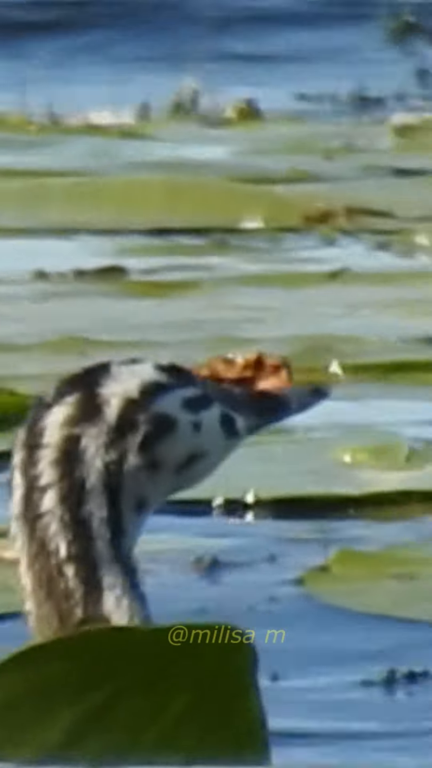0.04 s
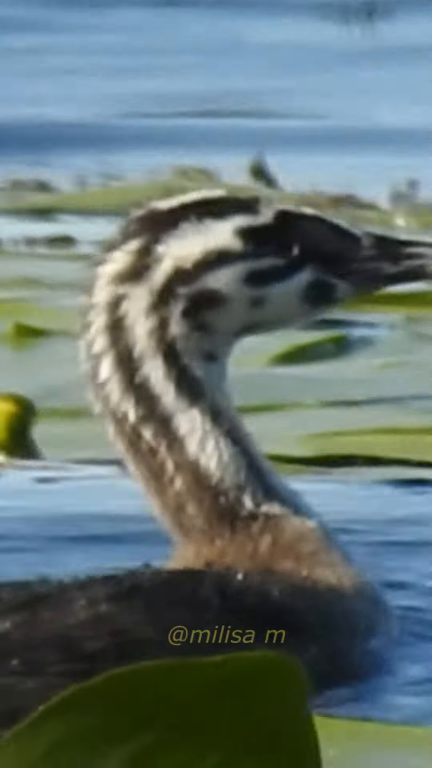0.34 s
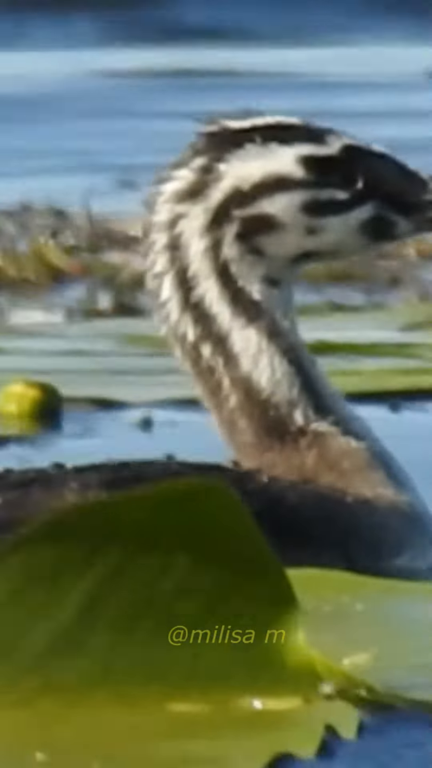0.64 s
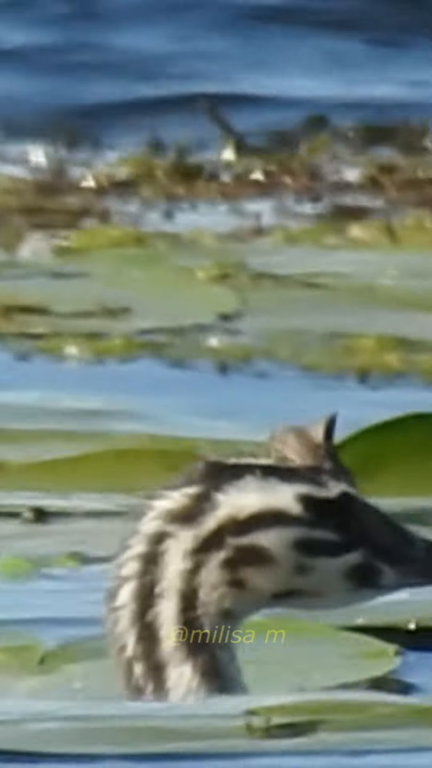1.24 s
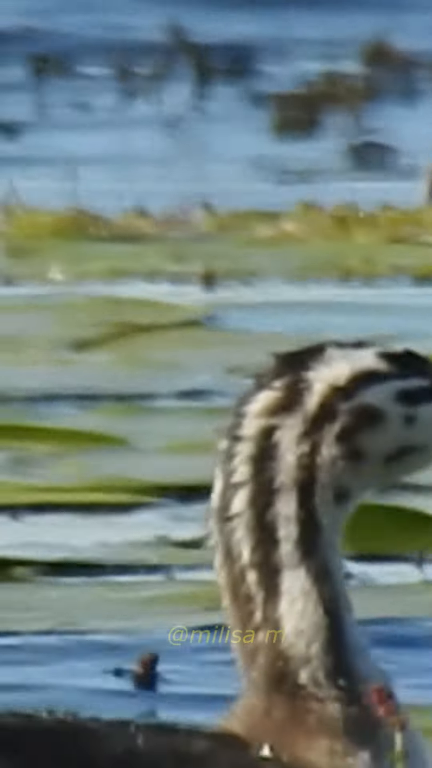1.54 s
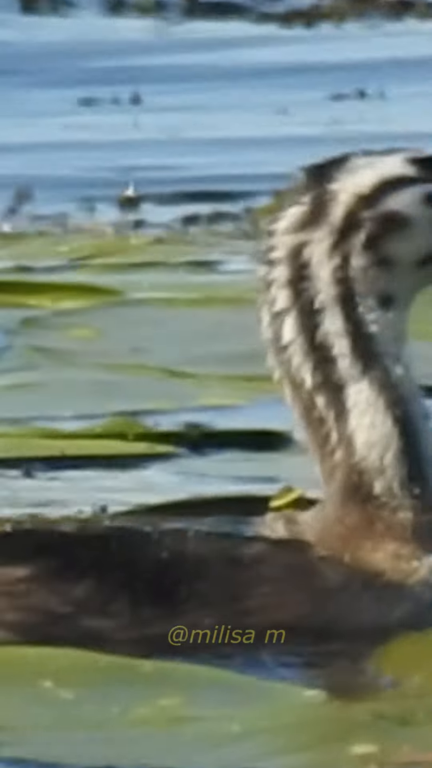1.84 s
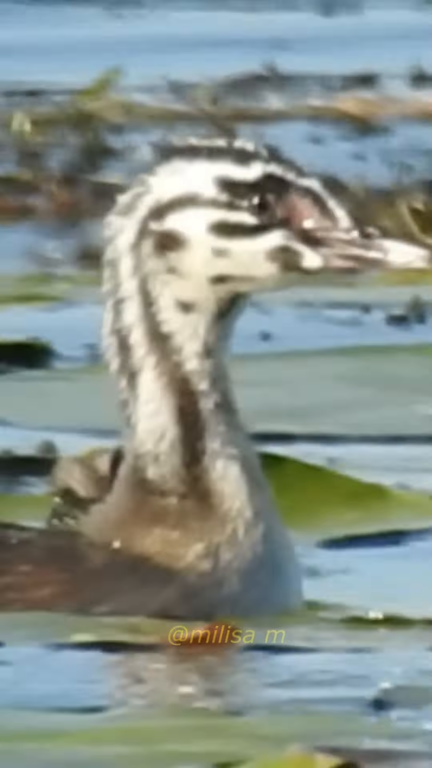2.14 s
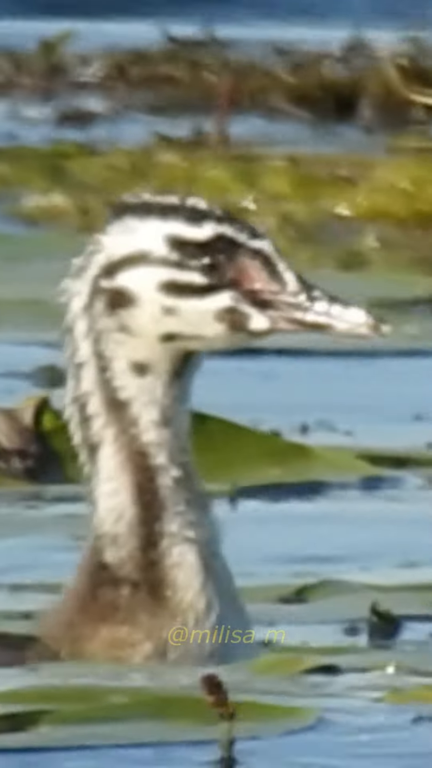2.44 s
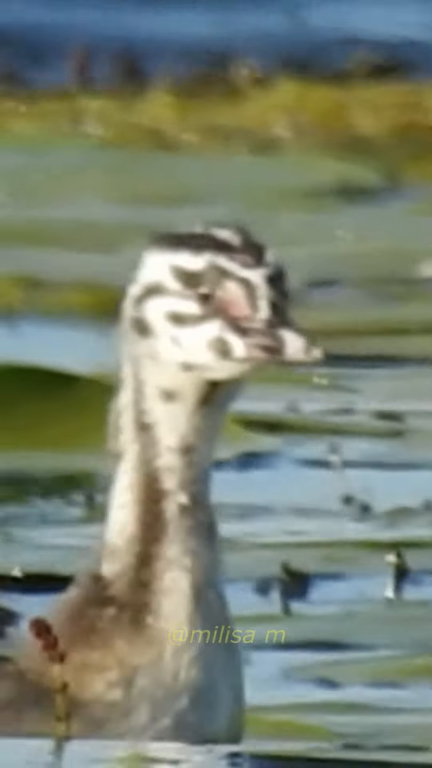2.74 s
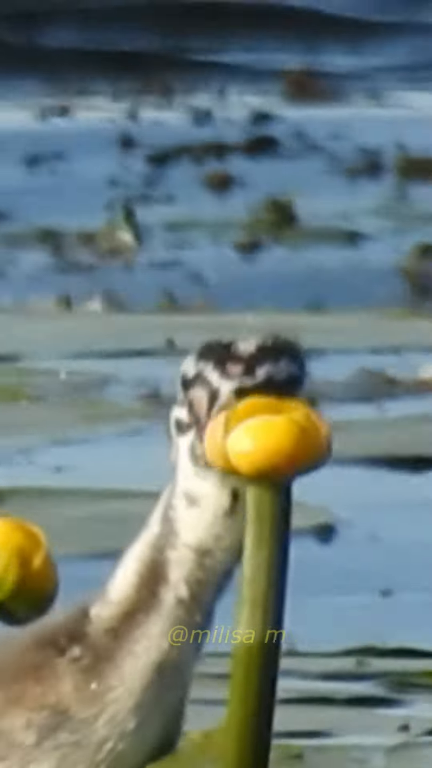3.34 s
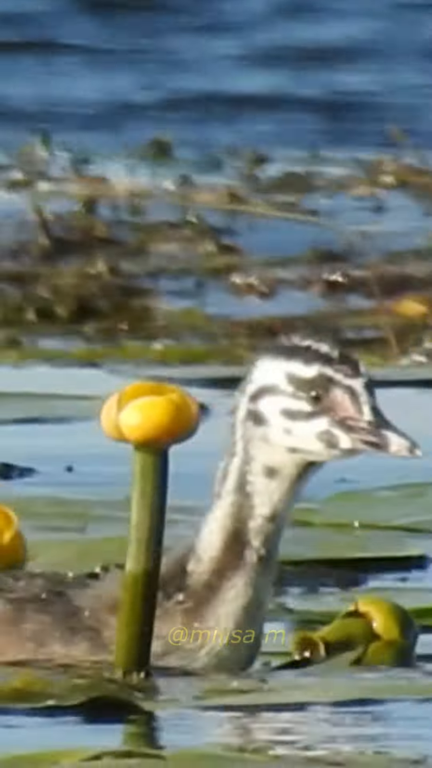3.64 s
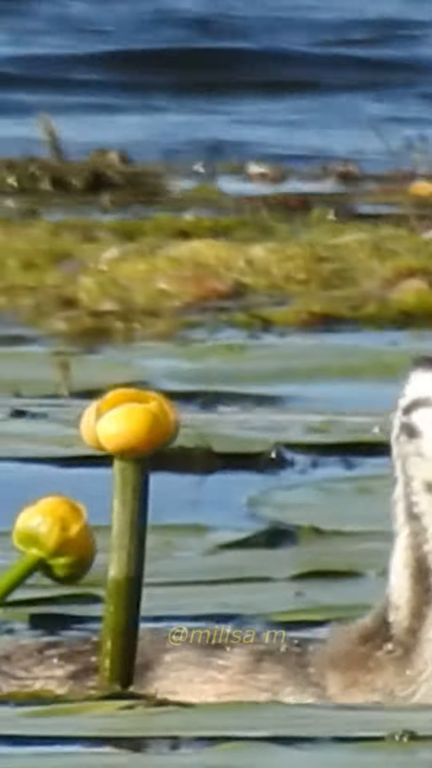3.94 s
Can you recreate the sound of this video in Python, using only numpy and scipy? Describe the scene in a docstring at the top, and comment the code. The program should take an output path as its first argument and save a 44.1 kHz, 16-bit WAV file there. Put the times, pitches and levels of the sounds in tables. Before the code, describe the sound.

Distant birdsong, with thin whistles, chips and piping notes, echoes lightly over a pond, right of the microphone. Soft wind and a low rumble lie beneath. The sound fades away, then cuts back in with more chirping.

```python
"""Small birds sing far off across a pond, mostly along the right bank. Each whistle, chip or hoot
is a pure tone that bends in pitch as it swells and dies, smeared by the echo of the trees.
Behind them a breeze makes a soft rush of air and reeds over a low rumble, both shaped from noise.
The sound fades to a moment of silence and comes back abruptly on a slightly louder stretch."""
import sys
import numpy as np
from scipy import signal
from scipy.fft import rfft, irfft, next_fast_len
from scipy.io import wavfile
from scipy.ndimage import uniform_filter1d, map_coordinates

SR = 44100
rng = np.random.default_rng(int(sys.argv[2]) if len(sys.argv) > 2 else 0)


def generate_wav(sig):
    """Save sig (samples, or channels by samples) to the path in sys.argv[1] as 16-bit PCM at SR."""
    pcm = np.round(np.clip(np.atleast_2d(sig).T, -1, 1) * 32767).astype(np.int16)
    wavfile.write(sys.argv[1], SR, pcm)


N = 176400  # 4 seconds
FADE_START_S, FADE_END_S, RESUME_S = 1.704, 2.515, 2.578

# Sliding notes. Pan is left minus right, so below zero is to the right; rasp is a share of the pitch.
# start_s, length_s, first_hz, middle_hz, last_hz, level_db, pan_db, echo_db, rasp
SLURRED_NOTES = [(-.04, .11, 5660, 5260, 4800, -38, -12, 3, .04),
                 (0.046, 0.11, 4985, 4600, 4605, -37, -9, 0.5, 0.0312),
                 (.0, .12, 2180, 2090, 2170, -45.5, -4, 8.5, 0.034),
                 (0.186, 0.046, 2684, 2751, 2680, -40, -5.5, 0, 0.043),
                 (0.344, 0.034, 1603, 1620, 1510, -44.5, -2, 2.5, 0.041),
                 (0.416, 0.051, 3060, 3206, 2950, -44.5, -8, 3, 0.038),
                 (.49, 0.062, 2467, 2667, 2710, -44, -18, 0.5, 0.019),
                 (.66, 0.019, 1595, 1710, 1590, -41.5, -5, 8, 0.12),
                 (.675, 0.053, 4080, 3870, 3760, -44, -8, 10, 0.018),
                 (0.717, 0.075, 3750, 3548, 3420, -36.5, -12.5, -2, 0.017),
                 (.935, 0.061, 1546, 1529, 1477, -46.5, -6, 3, 0.027),
                 (0.997, 0.056, 4400, 4550, 4850, -54, -2, 5, 0.015),
                 (1.129, 0.18, 1930, 1972, 2010, -55.5, -7, -21, 0.019),
                 (1.153, 0.022, 5370, 5100, 5070, -39, -16, 0, 0.049),
                 (1.175, 0.091, 4450, 4440, 4680, -49, -8, 0, 0.028),
                 (1.393, .11, 3400, 3584, 3540, -46.5, -7, 3, 0.044),
                 (1.45, 0.088, 4250, 4250, 4280, -48.5, -7, 0, 0.0045),
                 (1.485, .07, 3780, 3666, 3140, -43.5, -14, -1, 0.012),
                 (1.503, 0.045, 5600, 6080, 6150, -45.5, -20, 1, 0.01),
                 (1.667, 0.11, 6790, 6810, 6980, -41.5, -17, 6, 0.036),
                 (1.798, 0.22, 6860, 6710, 6510, -44.5, -15, 5, 0.033),
                 (1.824, .035, 2820, 2897, 2930, -46, -5, 0, 0.0076),
                 (1.984, 0.0355, 6250, 6080, 5960, -37.5, -20, 2, 0.012),
                 (2.446, .05, 4200, 3300, 2580, -40, -7.5, -12, 0.058),
                 (2.577, 0.066, 3340, 3450, 3440, -43.5, 0, 7, 0.037),
                 (2.61, .035, 3120, 1880, 1580, -38, -3.5, 4, 0.089),
                 (2.92, 0.055, 2410, 2620, 2480, -46, 0, 0, 0.032),
                 (2.993, 0.035, 2162, 2204, 2310, -41, -1, 4, 0.026),
                 (3.051, .27, 5950, 5870, 5900, -43, -25, 4, 0.034),
                 (3.3, 0.17, 4176, 4167, 4240, -40.5, -7.5, 5, 0.0268),
                 (3.428, 0.138, 4190, 4070, 4076, -42, -7, -1, 0.031),
                 (2.568, 0.15, 4300, 4310, 4260, -53.5, -3, 5, .012),
                 (3.219, .22, 2110, 2037, 2120, -54.5, -1, -5, 0.049),
                 (3.478, 0.33, 5390, 5260, 5360, -47.5, -14, 1, 0.017),
                 (3.68, 0.11, 2430, 2300, 2315, -44, -1.5, 4, 0.055),
                 (3.667, 0.059, 4800, 4450, 4360, -39, -14, 5, 0.042),
                 (3.744, 0.285, 3237, 3236, 3205, -40.5, -3, 8, 0.049),
                 (3.821, 0.022, 5380, 5040, 4730, -38, -13, 4, 0.038),
                 (3.842, 0.066, 4810, 4580, 4690, -38, -7, 3, 0.034),
                 (3.942, 0.038, 6050, 6110, 6050, -41.5, -21, 5.5, 0.013)]
# Piping notes: start_s, length_s, pitch_hz, level_db
PIPING_NOTES = [(1.804, 0.067, 2370, -40), (1.92, 0.053, 2371, -42), (2.013, 0.08, 2440, -38),
                (2.143, 0.052, 2416, -38.5), (2.231, 0.035, 2348, -35), (2.423, 0.065, 2367, -31.5),
                (2.756, 0.065, 2334, -40)]
# Low, far hoots: start_s, length_s, pitch_hz, level_db
FAR_HOOTS = [(-.03, 0.3, 621, -54), (0.199, 0.24, 590, -54.5), (0.417, 0.17, 566, -51.5),
             (1.246, 0.17, 589, -55), (1.648, 0.16, 559.7, -51.5)]

def bird_chorus():
    """Scattered birds slide between pitches, pipe on nearly one pitch, or hoot softly."""
    out = np.zeros((2, N))
    for start, length, first, middle, last, db, pan, echo, rasp in SLURRED_NOTES:
        add_with_echo(out, start, note(length, (first, middle, last), waver=rasp), db, pan, echo)
    for start, length, hz, db in PIPING_NOTES:
        pipe = note(length, hz * np.array([0.98, 1.005, 0.99]), waver=0.014)
        add_with_echo(out, start, pipe, db, pan_db=-4.5, echo_db=0)
    for start, length, hz, db in FAR_HOOTS:
        hoot = note(length, (hz, hz, hz), waver=0.01)
        add_with_echo(out, start, hoot, db, pan_db=2, echo_db=-9.5)
    return out


# Loud chips: start_s, base_level_db
FALLING_CHIPS = [(3.555, -38.5), (3.702, -39.5), (3.868, -40)]
# Lower ticks: start_s, level_db
FALLING_TICKS = [(1.697, -47.5), (1.901, -41.5), (2.105, -42), (2.317, -39), (3.79, -44.5), (3.839, -38),
                 (3.893, -46)]
# Upward sweeps: start_s, pitch_scale, level_db, echo_db
RISING_SWEEPS = [(1.703, 1.39, -41.5, 4), (1.924, 1.33, -38, 6), (2.155, 1, -35.5, 0.5),
                 (2.365, 1.033, -32.5, 3)]
# High notes that dip and rise again: start_s, level_db
SCOOPED_NOTES = [(2.824, -44), (2.929, -41.5), (3.033, -39), (3.135, -40.5), (3.236, -35.5)]
# Ticks of a faint, even trill: start_s
TRILL_STARTS = [.677, .757, .835, .915, .995, 1.075, 1.155, 1.235, 1.315]

def repeating_birds():
    """Each bird repeats one short call: a chip, a tick, a warble into a sweep, a scoop or a trill tick."""
    out = np.zeros((2, N))
    chip_s, chip_hz = 0.032, (4143, 3500, 2815)
    for start, db in FALLING_CHIPS:
        clear = note(chip_s, chip_hz, waver=0.0046, peaked=5.3)
        add_with_echo(out, start, clear, db + 7.5, pan_db=-4, echo_db=-3)
        rough = note(chip_s, chip_hz, waver=0.056, peaked=0.24)  # heard mostly as echo
        add_with_echo(out, start, rough, db + 4.5, pan_db=-3, echo_db=15)
    for start, db in FALLING_TICKS:
        tick = note(0.0217, (2410, 1874, 1340), waver=0.067)
        add_with_echo(out, start, tick, db, pan_db=-1.5, echo_db=1)
    warble_s = 0.071
    for start, scale, db, echo in RISING_SWEEPS:
        warble = note(warble_s, np.full(3, scale * 3280), waver=0.0556, trill_hz=90.1, depth=0.072)
        add_with_echo(out, start - warble_s, warble, db - 5, pan_db=-11, echo_db=2.5)
        sweep = note(0.036, scale * np.array([3390, 4580, 5700]), waver=0.037)
        add_with_echo(out, start, sweep, db, pan_db=-11, echo_db=echo)
    for start, db in SCOOPED_NOTES:
        scoop = note(0.03, (6570, 5290, 6300), waver=0.012, peaked=0.5)
        add_with_echo(out, start, scoop, db, pan_db=-12, echo_db=2)
    for start in TRILL_STARTS:
        add_with_echo(out, start, note(0.018, (3360, 3160, 3180)), level_db=-54, pan_db=5, echo_db=-26)
    return out


# Buzzy calls: start_s, length_s, upper_hz, lower_hz, level_db, pan_db
BUZZY_CALLS = [(0.188, .16, 6740, 5967, -34.5, -15), (0.879, .17, 6660, 5940, -37, -15.5)]
# Faint, very high shimmers: start_s, length_s, pitch_hz, level_db
HIGH_SHIMMERS = [(0.203, 0.15, 10370, -62), (.9, 0.15, 10300, -65.5), (1.677, 0.51, 10600, -72)]

def buzzing_bird():
    """A bird sings two falling tones at once, shaking their pitch so fast that they buzz."""
    out = np.zeros((2, N))
    fall = 1 + 0.0286 * np.array([1, 0, -1])
    for start, length, upper, lower, db, pan in BUZZY_CALLS:
        voices = [note(length, hz * fall, waver=0.013, trill_hz=82, depth=0.027, peaked=0.94)
                  for hz in (upper, lower)]
        add_with_echo(out, start, sum(voices) / np.sqrt(2), db, pan, echo_db=5)
    for start, length, hz, db in HIGH_SHIMMERS:
        add_with_echo(out, start, note(length, hz * fall, waver=0.034), db, pan_db=-13, echo_db=0.5)
    return out


# Very high whistles: start_s, length_s, first_hz, last_hz, level_db, pan_db
THIN_WHISTLES = [(0.813, .26, 7810, 7683, -39.5, -5), (3.079, .4, 7760, 7484, -45.5, -11.5)]

def whistling_bird():
    """A thin whistle sags in pitch, with a much fainter tone above it."""
    out = np.zeros((2, N))
    for start, length, first, last, db, pan in THIN_WHISTLES:
        pitches = np.array([first, np.sqrt(first * last), last])
        add_with_echo(out, start, note(length, pitches, waver=0.0007, peaked=1.5), db, pan, echo_db=-0.5)
        add_with_echo(out, start, note(length, pitches * 1.5, waver=0.0007), db - 26, pan, echo_db=-3)
    return out


def note(length_s, pitches_hz, waver=0.0071, trill_hz=0, depth=0, peaked=1):
    """One bird note swells and dies as it curves through a first, middle and last pitch."""
    progress = np.linspace(0, 1, max(int(length_s * SR), 64))
    curve_hz = np.polyval(np.polyfit([0, 0.5, 1], pitches_hz, 2), progress)
    random_shake = waver * wobble(400, size=SR)[:len(progress)]
    even_shake = depth * np.sin(2 * np.pi * trill_hz * length_s * progress)
    hz = curve_hz * (1 + random_shake + even_shake)
    swell = np.abs(np.sin(np.pi * progress)) ** peaked
    return np.sqrt(2) * swell * np.sin(2 * np.pi * np.cumsum(hz) / SR)


# Time the echo of the trees takes to drop by 60 dB: pitch_hz, decay_s
TREE_ECHO_DECAY = [(500, 0.97), (2500, 1), (5000, 0.99), (8000, 0.71)]

def add_with_echo(out, start_s, call, level_db, pan_db, echo_db):
    """Add a call to out: it arrives directly, then as a dying wash scattered back by the trees."""
    build_s, likeness = 0.0055, 0.58
    t = np.arange(SR * 3 // 4) / SR
    strongest_hz = np.argmax(np.abs(rfft(call, SR // 2))) * 2
    decay = amp(-60 * t / value_at(TREE_ECHO_DECAY, strongest_hz))
    mid, side = rng.standard_normal((2, len(t))) * decay * (1 - np.exp(-t / build_s))
    width = np.arccos(likeness) / 2
    scatter = np.cos(width) * mid + np.sin(width) * np.array([side, -side])
    path = amp(echo_db) * scatter / np.linalg.norm(mid)
    path[:, 0] += 1  # the direct sound
    gain = amp(level_db) * pan_gains(pan_db) / np.hypot(1, amp(echo_db))
    heard = signal.fftconvolve(call[None], path, axes=1) * gain
    start = round(start_s * SR)
    stop = round(RESUME_S * SR) if start_s < FADE_END_S else N  # no echo carries across the pause
    heard = heard[:, max(-start, 0):stop - start]
    out[:, max(start, 0):][:, :heard.shape[1]] += heard


# Tone of the air and reeds before and after the pause: frequency_hz, relative_db
AIR_TONE_BEFORE = [(100, 1), (200, 1.5), (400, -9.5), (570, -2), (760, -11), (1150, -7.5), (1600, -12),
                   (3000, -11), (6500, -10), (7600, -17.5), (8600, -28.5), (12000, -36.5), (14000, -58)]
AIR_TONE_AFTER = [(100, 0.5), (200, -2), (400, -7), (570, -7.5), (760, -11.5), (1100, -9.5), (1600, -14.5),
                  (2300, -10.5), (4500, -13.5), (6500, -11), (7600, -21.5), (8600, -29), (12000, -42),
                  (14000, -62)]
# Swells in the low part of the breeze: time_s, gain_db
GUST_SWELLS = [(0, -2.5), (.4, 0), (.55, 3), (.9, 1.5), (1.15, -0.5), (1.42, 3), (1.6, -1), (2.0, -4),
               (2.45, 5.5), (2.6, -2.5), (2.85, 1), (3.1, -0.5), (3.4, 0), (4, 1.5)]

def breeze():
    """Air rushes through the reeds, stronger after the pause, with gusts below about 500 Hz."""
    t = np.arange(N) / SR
    before = shaped_noise(AIR_TONE_BEFORE, patchy_db=2.5) * amp(-47)
    after = shaped_noise(AIR_TONE_AFTER, patchy_db=2.37) * amp(-44)
    air = np.where(t > FADE_END_S, after, before) * amp(wobble(9) / 2)
    low = filtered(air, lambda hz: 1 / (1 + (hz / 500) ** 4))
    gust = amp(np.interp(t, *np.transpose(GUST_SWELLS)))
    return air - low + gust * low


# Tone of the rumble: frequency_hz, relative_db
RUMBLE_TONE = [(15, -20), (30, -43.5), (45, 3), (60, 5.5), (76, 6.5), (95, -3.5), (130, -19.5), (250, -56)]
# Rise and fall of the rumble: time_s, level_db
RUMBLE_SWELLS = [(0, -44.5), (.2, -41), (.45, -48.5), (1.1, -41.5), (1.4, -48), (1.6, -45.5), (2.0, -46.5),
                 (2.5, -42.5), (2.6, -48), (2.85, -40), (3.35, -43), (3.8, -43.5), (4, -42)]

def far_rumble():
    """Deep noise grows and shrinks restlessly in the distance."""
    level_db = np.interp(np.arange(N) / SR, *np.transpose(RUMBLE_SWELLS))
    return shaped_noise(RUMBLE_TONE, patchy_db=-1.5) * amp(level_db + wobble(11) / 2)


# How alike the noise is left and right (1 means the same): frequency_hz, likeness
NOISE_LIKENESS = [(60, 0.99), (200, .88), (600, 0.84), (1500, 0.57), (3000, 0.83), (5000, 0.17),
                  (9000, 0.017)]
# Which way the noise leans: frequency_hz, pan_db
NOISE_PAN = [(60, -0.9), (400, 0.5), (1200, -1.5), (2500, -4), (4500, -9.5), (9000, -2.5)]

def shaped_noise(tone, patchy_db):
    """Stereo noise with the given tone and random louder and softer patches."""
    def response(hz):
        width = np.arccos(value_at(NOISE_LIKENESS, hz)) / 2
        return amp(value_at(tone, hz)) * [np.cos(width), np.sin(width)]

    bands = signal.stft(rng.standard_normal((2, N)), nperseg=512)[2]
    patches = uniform_filter1d(rng.standard_normal(bands.shape[1:]), size=4, axis=0)  # blur in pitch
    patches = uniform_filter1d(patches, size=16, axis=1)  # blur in time
    noise = signal.istft(bands * amp(patchy_db * unit(patches)), nperseg=512)[1][:, :N]
    mid, side = filtered(noise, response)
    stereo = np.array([mid + side, mid - side])
    return unit(filtered(stereo, lambda hz: pan_gains(value_at(NOISE_PAN, hz))))


def amp(db):
    """Turn decibels into a gain."""
    return 10 ** (np.asarray(db) / 20)


def unit(x):
    """Scale to an average (rms) level of 1."""
    return x / np.sqrt(np.mean(x ** 2) + 1e-20)


def value_at(table, hz):
    """Read between the rows of a table, on a log frequency scale."""
    row_hz, values = np.transpose(table)
    return np.interp(np.log(hz + 1), np.log(row_hz + 1), values)


def wobble(rate, size=N):
    """A smooth curve through rate random points a second."""
    points = rng.standard_normal(int(size * rate / SR) + 4)
    return map_coordinates(points, [np.arange(size) * rate / SR])


def filtered(x, response):
    """Turn each frequency of x up or down by response(hz)."""
    size = next_fast_len(N + SR // 2)
    return irfft(rfft(x, size) * response(np.fft.rfftfreq(size, 1 / SR)), size)[..., :N]


def pan_gains(pan_db):
    """Left and right gains that keep the total power the same."""
    gains = amp(np.array([[0.5], [-0.5]]) * pan_db)
    return gains / np.sqrt(np.mean(gains ** 2, axis=0))


def scene():
    """Birds over the breeze and the rumble."""
    background = breeze() + far_rumble()
    return whistling_bird() + buzzing_bird() + bird_chorus() + repeating_birds() + background


def record(dry):
    """Fade evenly to silence, come back suddenly, and cut everything above 13200 Hz."""
    t = np.arange(N) / SR
    fade_out = np.clip((FADE_END_S - t) / (FADE_END_S - FADE_START_S), 0, 1)
    come_back = np.clip((t - RESUME_S) / 0.0019, 0, 1)
    return filtered(dry * (fade_out + come_back), lambda hz: hz < 13200)


dry = scene()
out = record(dry)
generate_wav(out)
```